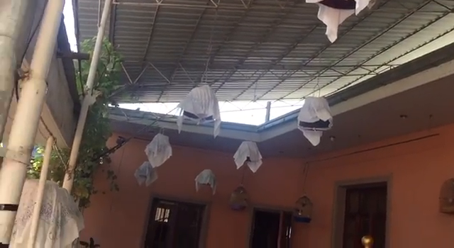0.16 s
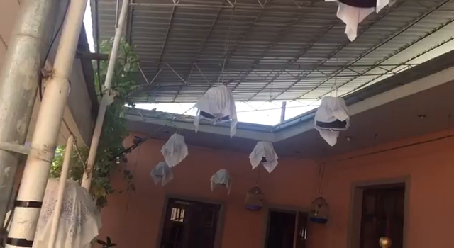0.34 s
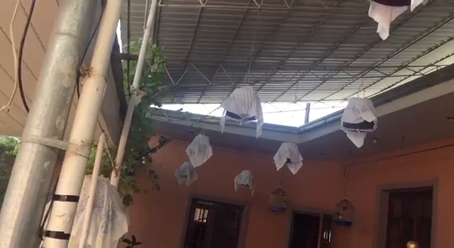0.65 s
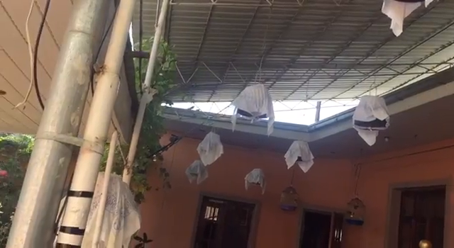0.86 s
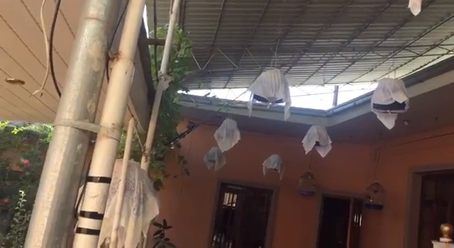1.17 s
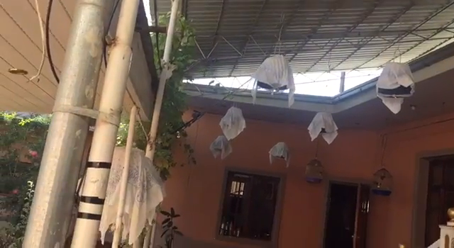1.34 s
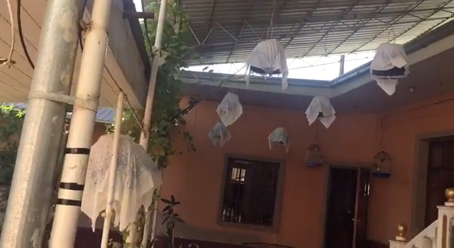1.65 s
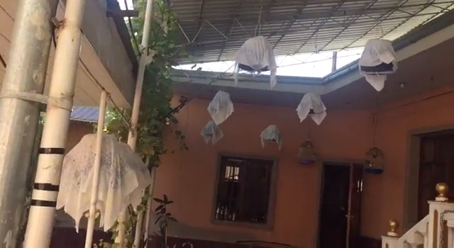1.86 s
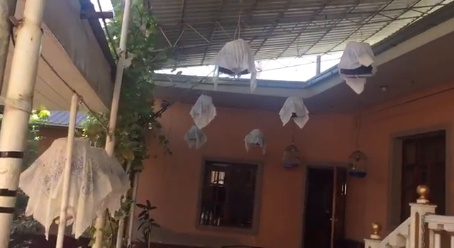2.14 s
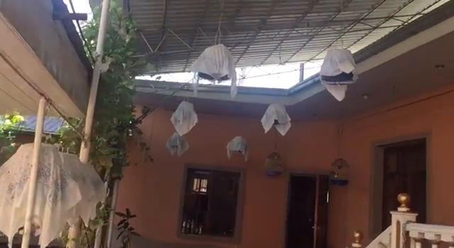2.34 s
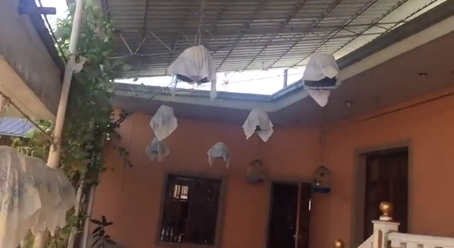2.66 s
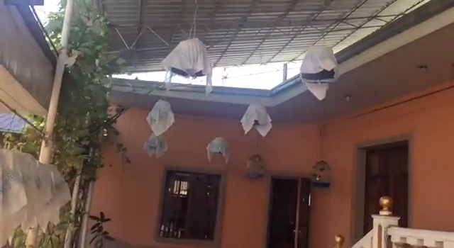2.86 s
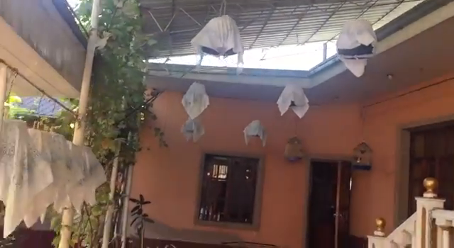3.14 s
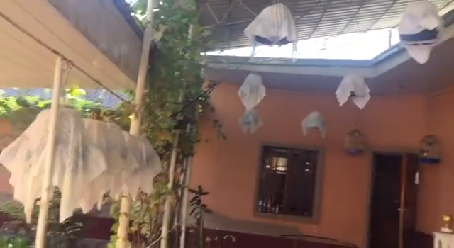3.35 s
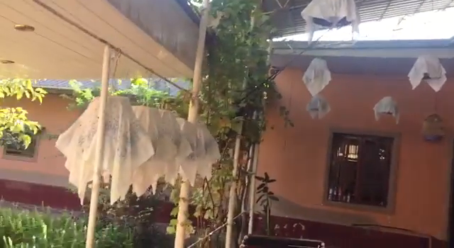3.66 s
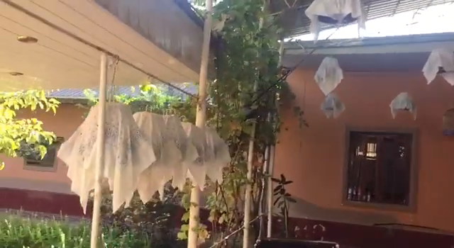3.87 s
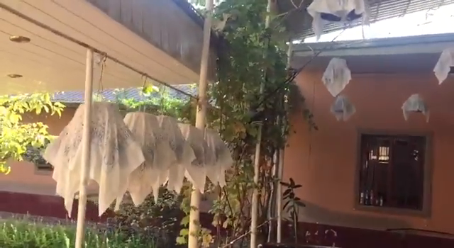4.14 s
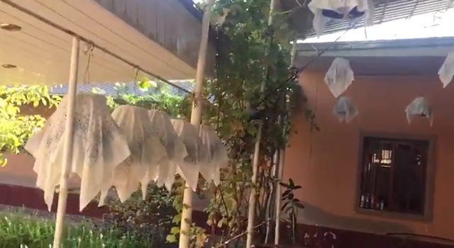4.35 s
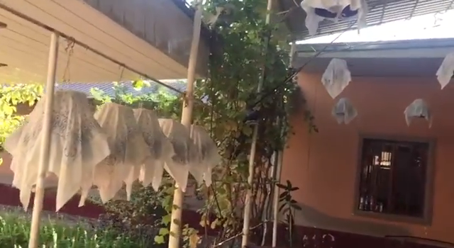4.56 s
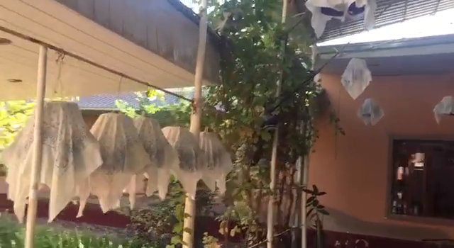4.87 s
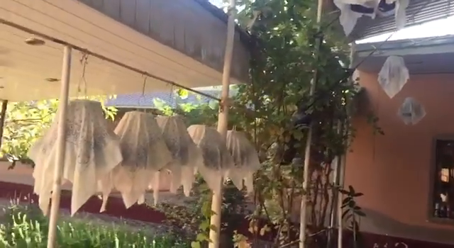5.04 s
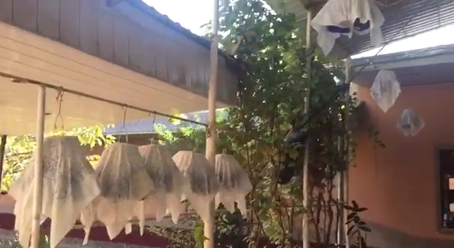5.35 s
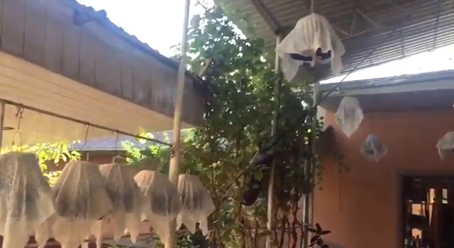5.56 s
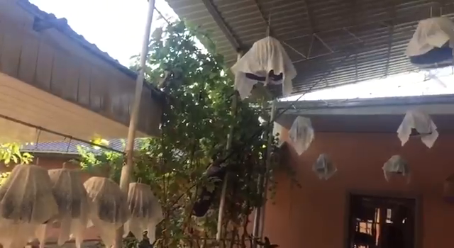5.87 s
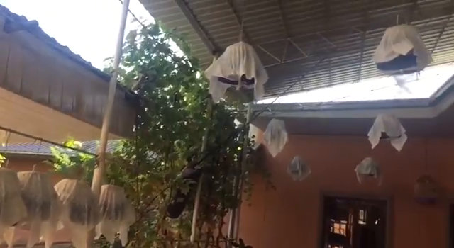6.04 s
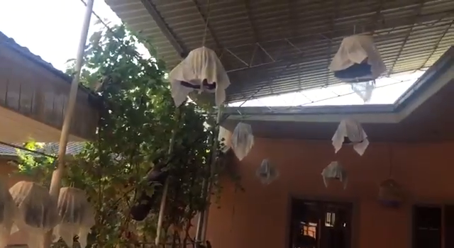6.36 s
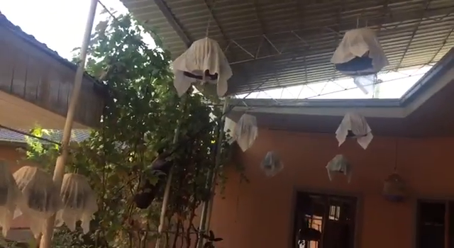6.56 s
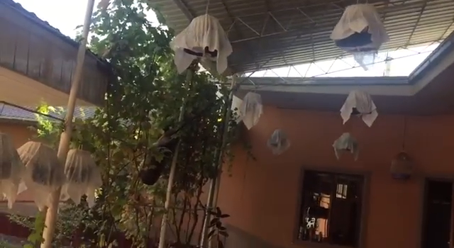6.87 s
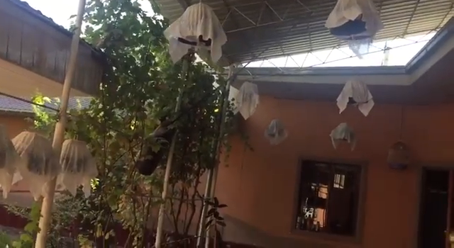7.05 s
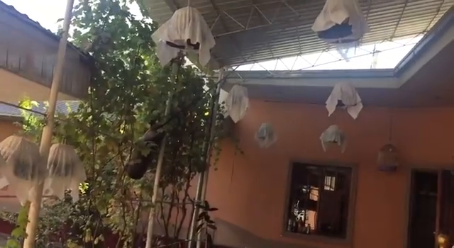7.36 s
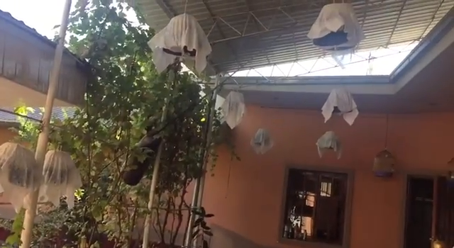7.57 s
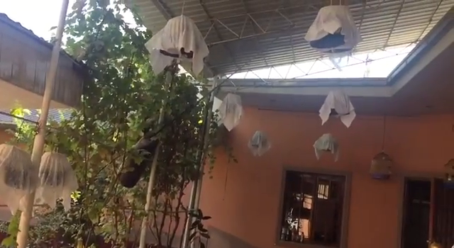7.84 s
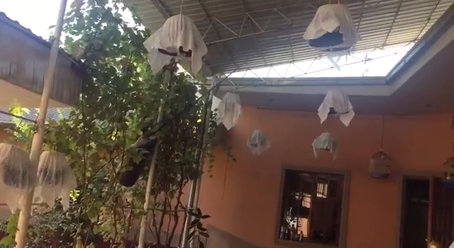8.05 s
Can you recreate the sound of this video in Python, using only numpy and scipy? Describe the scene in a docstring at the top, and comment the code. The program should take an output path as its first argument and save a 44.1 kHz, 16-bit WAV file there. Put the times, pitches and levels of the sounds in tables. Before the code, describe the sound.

Caged quails repeat sharp three-note calls, some led by a hoarse growl, echoing in a quiet roofed courtyard.

```python
"""Quails in a roofed courtyard

Caged quails call: each call is three whip-like pips, each a sine swept up through two octaves.
A hoarse growl of two or three syllables leads into some calls, and a soft grunt lies between the
last two pips. A small bird peeps once and a few light knocks are heard. Walls and a sheet roof
answer everything, over a faint outdoor hush."""
import sys
import numpy as np
from scipy import signal
from scipy.fft import rfft, irfft, next_fast_len
from scipy.io import wavfile
from scipy.ndimage import map_coordinates

SR = 44100
rng = np.random.default_rng(int(sys.argv[2]) if len(sys.argv) > 2 else 0)


def unload_wav(signal):
    """Save mono or channel-first audio to the path in sys.argv[1] as 16-bit WAV at rate SR, clipped to [-1, 1]."""
    wavfile.write(
        sys.argv[1],
        SR,
        np.round(np.clip(np.atleast_2d(signal).T, -1, 1) * 32767).astype(np.int16),
    )


N = 362061


def amp(db):
    return 10 ** (np.asarray(db) / 20)


def unit_rms(x):
    return x / np.sqrt(np.mean(x ** 2) + 1e-20)


def along(points, hz):
    """Read a curve of (frequency, value) points on a log frequency axis."""
    freqs, values = np.transpose(points)
    return np.interp(np.log(hz + 1), np.log(freqs + 1), values)


def curves(rows, t):
    """Each column after the first, read at the times t."""
    times, *columns = np.transpose(rows)
    return [np.interp(t, times, column) for column in columns]


def clock(length_s):
    return np.arange(int(length_s * SR)) / SR


def wobble(rate_hz, t):
    """A smooth random curve with rate_hz knots a second."""
    return map_coordinates(rng.standard_normal(4096), [t * rate_hz], mode="wrap")


def filtered(x, response):
    """EQ x with a gain given as a function of frequency."""
    size = next_fast_len(len(x) + 8192)
    return irfft(rfft(x, size) * response(np.fft.rfftfreq(size, 1 / SR)), size)[:len(x)]


def add(track, start_s, x):
    """Mix x into the track from start_s on."""
    part = track[max(round(start_s * SR), 0):][:len(x)]
    part += x[:len(part)]


# Tone of the outdoor air: freq_hz, gain_db
HUSH_EQ = [(15, -45), (25, -16.5), (76, -2.5), (157, -4), (378, -9), (409, -10.5), (465, -8.5),
           (603, -14.5), (961, -12.5), (1610, -16.5), (9860, -32), (12100, -34.5), (15800, -67),
           (22000, -120)]


def hush(level_db=-63):
    """A faint, steady bed of outdoor air, weighted to the lows."""
    air = filtered(rng.standard_normal(N), lambda hz: amp(along(HUSH_EQ, hz)))
    return amp(level_db) * unit_rms(air)


# Early reflections off the walls: delay_s, gain
WALL_ECHOES = [(.0033, 0.41), (.0065, 0.33), (.011, 0.27), (.034, .25), (.05, 0.13)]
# Decay of the reverb tail: freq_hz, t60_s
TAIL_DECAY = [(400, 0.6), (1200, 0.76), (2100, 0.72), (3200, 0.64), (4500, 0.55), (8500, 0.33),
              (11000, 0.27)]
# Tone of the reverb tail: freq_hz, gain_db
TAIL_EQ = [(400, -5.5), (1100, -0.5), (1500, -1), (2100, 1), (2700, 1), (3400, 1), (4500, 0), (9000, 3),
           (12000, -2)]


def courtyard(x, wet_db, roof_db=-10, roof_delay_s=0.024, build_s=0.0011):
    """Direct sound, wall echoes, a roof slap and a diffuse tail; they shift as bird and listener move."""
    hz, t, noise = signal.stft(rng.standard_normal(SR), SR, nperseg=256)
    fade = amp(along(TAIL_EQ, hz)[:, None] - 60 * t / along(TAIL_DECAY, hz)[:, None])
    tail = signal.istft(noise * fade, SR, nperseg=256)[1][:SR]
    tail *= 1 - np.exp(-clock(1) / build_s)
    response = amp(wet_db) * tail / np.linalg.norm(tail)
    for (delay_s, gain), shift in zip(WALL_ECHOES, rng.uniform(-0.83, 1, len(WALL_ECHOES))):
        add(response, delay_s * (1 + .12 * shift), np.array([gain]))
    roof_slap = np.minimum(amp([roof_db]), .5)
    add(response, roof_delay_s * rng.normal(1, .02), roof_slap)
    response[0] += 1  # direct sound
    return signal.fftconvolve(x, response)


# Light knocks: start_s, level_db, centre_hz
KNOCK_HITS = [(0.458, -49.5, 1370), (0.663, -44.5, 2030), (3.546, -50, 7070), (3.723, -43.5, 6940),
              (5.171, -59.5, 630), (5.261, -37.5, 647), (6.219, -53, 458), (7.537, -51, 394),
              (7.565, -50, 4940), (7.85, -46.5, 6000)]
KNOCK_DECAY = [(500, 0.15), (2000, .085), (6500, 0.029)]  # centre_hz, t60_s


def knocks(wet_db=-7, attack_s=0.0032, spread_octaves=.85):
    """Dull taps and scuffs: each a noise burst in one broad band; the bright ones die sooner."""
    out, t = np.zeros(N), clock(.25)
    for start_s, level_db, centre_hz in KNOCK_HITS:
        band = lambda hz: np.exp(-(np.log2((hz + 1) / centre_hz) / spread_octaves) ** 2 / 2)
        burst = unit_rms(filtered(rng.standard_normal(len(t)), band))
        decay = amp(level_db - 60 * t / along(KNOCK_DECAY, centre_hz))
        attack = 1 - np.exp(-t / attack_s)
        add(out, start_s, courtyard(burst * decay * attack, wet_db))
    return out


# Contour of the small bird's note: time_s, pitch_hz, level_db
PEEP_CONTOUR = [(0.234, 3930, -70), (0.249, 4130, -45), (.275, 4156, -43), (0.299, 4706, -45.5),
                (.352, 4800, -50), (0.391, 4630, -55)]


def peep(octave_db=-28, wet_db=-1):
    """A small bird's thin, quavering, rising whistle with a weak octave."""
    out, start_s = np.zeros(N), PEEP_CONTOUR[0][0]
    t = clock(PEEP_CONTOUR[-1][0] - start_s)
    pitch_hz, level_db = curves(PEEP_CONTOUR, start_s + t)
    quaver = 0.041 * t / t[-1] * wobble(350, t)  # grows through the note
    phase = 2 * np.pi * np.cumsum(pitch_hz * (1 + quaver)) / SR
    whistle = np.sin(phase) + amp(octave_db) * np.sin(2 * phase)
    add(out, start_s, courtyard(amp(level_db) * whistle, wet_db))
    return out


# Tone of the quail's throat: freq_hz, gain_db
THROAT_EQ = [(300, -14.5), (470, -2.5), (520, -4), (620, -9.5), (1000, -1.5), (1600, 4), (2500, -4),
             (3300, -21.5), (5000, -36.5), (8000, -40), (12000, -50.5)]


def hoarse_voice(t, pitch_hz, beak_peaks, jitter, flutter_db, peak_width_hz=300, harmonics=20):
    """Unsteady harmonics, shaped by the throat and by beak resonances (centre_hz, boost_db)."""
    phase = 2 * np.pi * np.cumsum(pitch_hz * (1 + jitter * wobble(260, t))) / SR
    multiples = np.arange(1, harmonics + 1)[:, None]
    hz = multiples * pitch_hz
    beak_db = sum(db / (1 + ((hz - centre_hz) / peak_width_hz) ** 2) for centre_hz, db in beak_peaks)
    gains = amp(along(THROAT_EQ, hz) + beak_db)
    voice = np.sum(gains * np.sin(multiples * phase), axis=0) / np.linalg.norm(gains, axis=0)
    return unit_rms(voice * amp(flutter_db * wobble(172.5, t)))


def grunts(calls, relative_db=-37, delay_s=.012, length_s=0.14, centre_pitch_hz=533.7):
    """A soft, rough swell of the low voice links the last two pips of each call; its pitch wanders."""
    out, t = np.zeros(N), clock(length_s)
    swell = signal.windows.tukey(len(t), .5)
    for start_s, long_gap_s, _, level_db, *_ in calls:
        pitch_hz = centre_pitch_hz * (1 + .05 * wobble(22, t))
        voice = hoarse_voice(t, pitch_hz, beak_peaks=[(1100, 7)], jitter=.06, flutter_db=6.0)
        grunt = amp(level_db + relative_db) * voice * swell
        add(out, start_s + long_gap_s + delay_s, courtyard(grunt, wet_db=0))
    low_shelf = [(550, -4), (900, 0.0033)]  # weakens the fundamental: freq_hz, gain_db
    return filtered(out, lambda hz: amp(along(low_shelf, hz)))


# Growl syllables: start_s, length_s, level_db, start_pitch_hz, end_pitch_hz,
# open_beak_hz, open_beak_db, open_jitter_ratio
GROWL_SYLLABLES = [(3.46, 0.2, -37.5, 475, 556.3, 1650, 7.5, .028),
                   (3.675, 0.15, -35.5, 570.4, 548, 1980, 12.5, .05),
                   (6.805, 0.14, -40, 468, 489, 1000, 15, 0.054),
                   (6.943, 0.1, -36.5, 446.7, 566.5, 1260, 13.5, 0.056),
                   (7.755, 0.166, -34, 580, 478, 1560, -5, 0.0089),
                   (7.918, 0.056, -28.5, 593, 572, 1170, 16.5, 0.064),
                   (7.967, 0.0513, -23.5, 507.4, 507, 2040, 24, 0.013)]
SHUT_BEAK_HZ, SHUT_BEAK_DB, SHUT_JITTER = 1080, 20, .035  # a nearly shut beak: low, hard and rougher


def growls(wet_db=-4, settle_s=.042, attack_s=0.017, release_s=0.016, beak_snap=2.8):
    """The low 'wa-wa' before a call: in each syllable the pitch settles while the beak opens and shuts."""
    out = np.zeros(N)
    for start_s, length_s, level_db, start_hz, end_hz, open_hz, open_db, open_jitter in GROWL_SYLLABLES:
        t = clock(length_s)
        shut = np.abs(np.cos(np.pi * t / length_s)) ** beak_snap  # more snap opens the beak sooner
        pitch_hz = end_hz + (start_hz - end_hz) * np.exp(-t / settle_s)
        jitter = open_jitter + SHUT_JITTER * shut
        flutter_db = np.clip(90 * jitter, 0, 3.5)  # the level shakes only where the pitch does
        beak_peaks = [(SHUT_BEAK_HZ, SHUT_BEAK_DB * shut), (open_hz, open_db * (1 - shut))]
        voice = hoarse_voice(t, pitch_hz, beak_peaks, jitter, flutter_db)
        envelope = np.clip(np.minimum(t / attack_s, (length_s - t) / release_s), 0, 1)
        add(out, start_s, courtyard(amp(level_db) * envelope * voice, wet_db))
    return out


# Shape of one pip around its knee, where the whip takes off: time_sweeps, pitch_ratio, level_db
WHIP_CONTOUR = [(-1.6, 0.54, -56.5), (-1.2, .63, -30.5), (-.45, .76, -23), (-.2, .89, -9.5),
                (0, 1.022, -2.5), (0.33, 1.08, -3.5), (0.52, 1.181, 0), (0.77, 1.513, -2.5),
                (0.915, 1.855, -1), (0.995, 2.273, -18.5), (1.14, 2.1, -55)]
# Overtones of a forceful pip, ahead of the beak: harmonic_number, level_db
PIP_OVERTONES = [(2, -23), (3, -45.5), (4, -33), (5, -67.5)]
# Tone the beak gives to overtones and rasp: freq_hz, gain_db
BEAK_EQ = [(800, -25.5), (3000, 5), (4000, -5.5), (5000, -6.5), (6200, -1.5), (7400, -9.5), (8700, -6),
           (11000, -18.5), (12200, -10)]


def pip(knee_hz, sweep_s, top_db, lead_db, rasp_db=-37, waver=0.013, brightening=0.91, tremble_db=1.5):
    """A sine slides up to the knee, lingers there, then whips upward and cuts off."""
    t = clock(.06)
    progress = (t - t.mean()) / sweep_s  # 0 at the knee, 1 at the top
    pitch_ratio, shape_db = curves(WHIP_CONTOUR, progress)
    pitch_hz = knee_hz * pitch_ratio * (1 + waver * wobble(500, t))
    phase = 2 * np.pi * np.cumsum(pitch_hz) / SR
    overtones = sum(amp(db) * np.sin(round(k) * phase) * (k * pitch_hz < SR / 2)
                    for k, db in PIP_OVERTONES)
    # overtones grow with the force of the whip; they leave through the beak with rasping air
    edge = amp(brightening * top_db) * overtones + amp(rasp_db) * rng.standard_normal(len(t))
    voice = np.sin(phase) + filtered(edge, lambda hz: amp(along(BEAK_EQ, hz)))
    in_lead = np.clip((-progress - .45) / 0.96, 0, 1)
    in_top = np.clip((progress - .45) / .5, 0, 1)
    effort = amp(shape_db + lead_db * in_lead + top_db * in_top + tremble_db * wobble(338.7, t))
    return effort * voice * signal.windows.tukey(len(t), .2)


# Quail calls: start_s (first knee), long_gap_s, short_gap_s, level_db, first_pip_db,
# knee_hz, sweep_s (knee to top), whip_top_db, direct_path_db
CALLS = [(1.467, .214, 0.12, -9.5, -9.5, 1966, .0135, -14.5, -1),
         (1.593, .238, 0.11, -8.5, -11.5, 1968, 0.018, -3.5, -3.5),
         (2.695, .230, 0.12, -8, -1.5, 1964, .0148, -2, 0),
         (3.855, .231, .119, -8, -2.5, 1979, .015, -2, 3),
         (4.454, .250, .132, -7, -2.5, 1840, .0132, -3, -5),
         (5.592, 0.24, .131, -7, -1.5, 1840, .012, -3, -3),
         (6.678, .232, .136, -5.5, -1.5, 1832, 0.013, -5, -3),
         (7.060, 0.23, 0.11, -8.5, -17, 1967, .0135, -12, 0.5),
         (8.004, 0.23, 0.1, -4.5, -2, 1935, .014, -5.5, 3)]


def quail_calls(wet_db=-2.5, roof_db=-7, roof_slope=1.1):
    """One pip, a long gap, a quick pair; the direct level varies from cage to cage, the tail's does not."""
    out = np.zeros(N)
    for start_s, long_gap_s, short_gap_s, level_db, first_db, knee_hz, sweep_s, top_db, direct_db in CALLS:
        knee_times = start_s + np.cumsum([0, long_gap_s, short_gap_s])
        # the first pip is duller and starts abruptly; the middle one is the strongest
        accents = [(first_db, -2.5, -14.5), (0, 0, 0), (-2, 0, 0)]
        slap_db = roof_db - roof_slope * direct_db  # the roof stands out as the direct path weakens
        for knee_s, (stress_db, top_trim_db, lead_db) in zip(knee_times, accents):
            note = amp(level_db + stress_db + direct_db) * pip(knee_hz, sweep_s, top_db + top_trim_db, lead_db)
            add(out, knee_s - len(note) / SR / 2, courtyard(note, wet_db - direct_db, slap_db))
    return out


def scene():
    """The mono mix: quails up front, the small bird, knocks and hush behind."""
    return (quail_calls() + growls() + grunts(CALLS) + peep() + knocks() + hush())[None]


def record(dry, limit_hz=12250):
    """The microphone rolls off in the top treble and keeps nothing above its band limit."""
    response = lambda hz: amp(along([(11000, 0), (limit_hz, -9)], hz)) * (hz < limit_hz)
    return np.array([filtered(channel, response) for channel in dry])


dry = scene()
out = record(dry)
unload_wav(out)
```